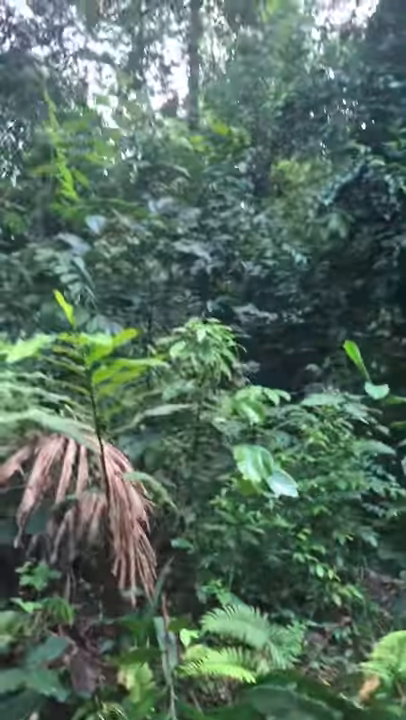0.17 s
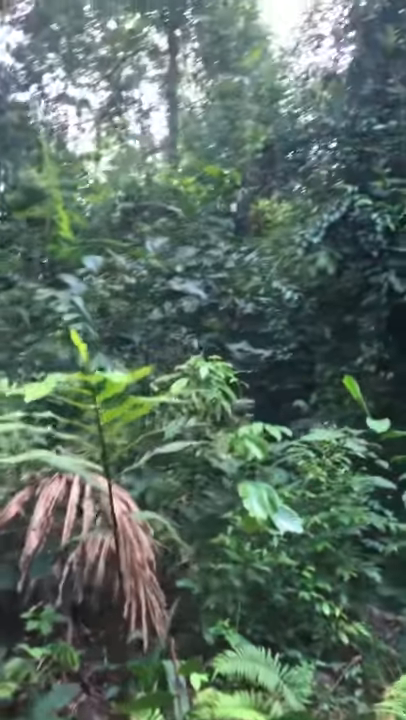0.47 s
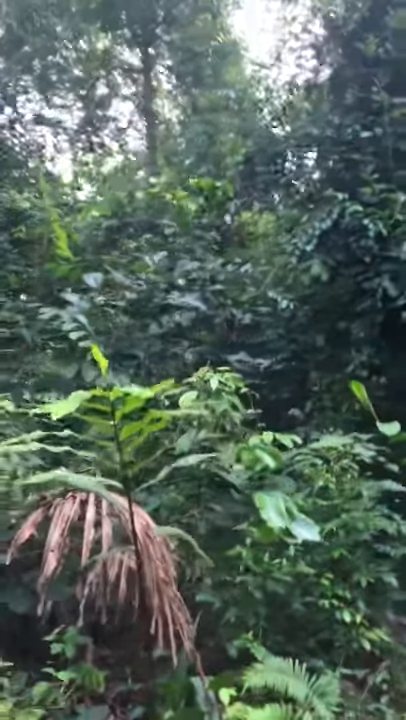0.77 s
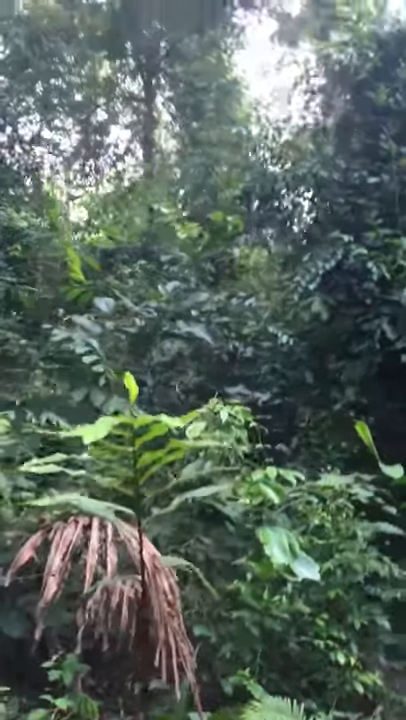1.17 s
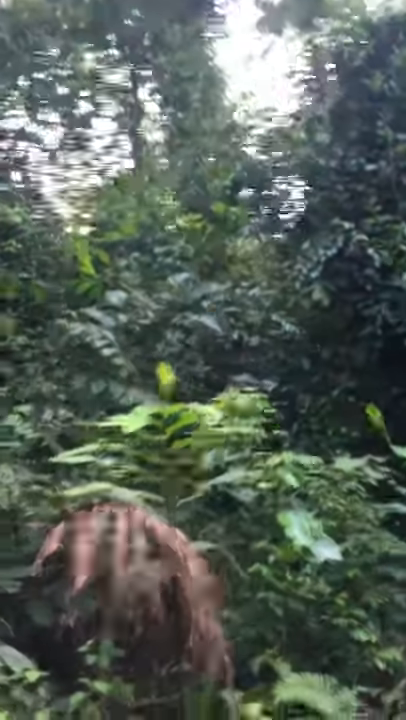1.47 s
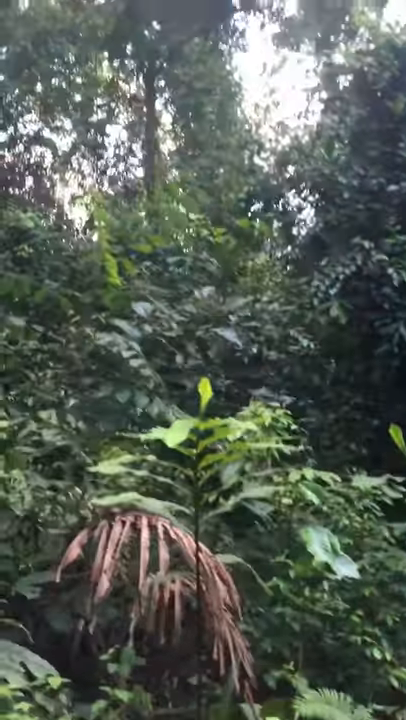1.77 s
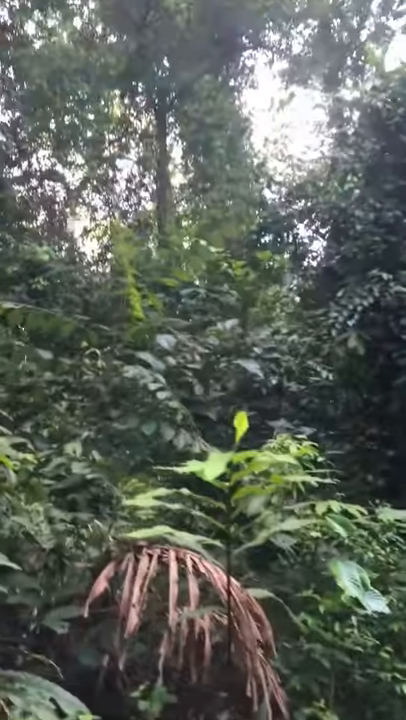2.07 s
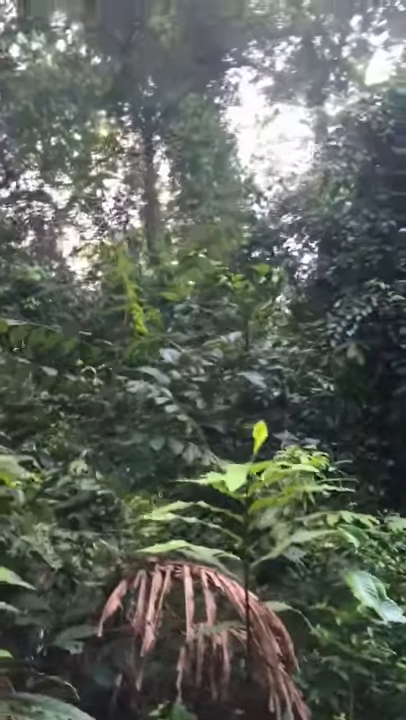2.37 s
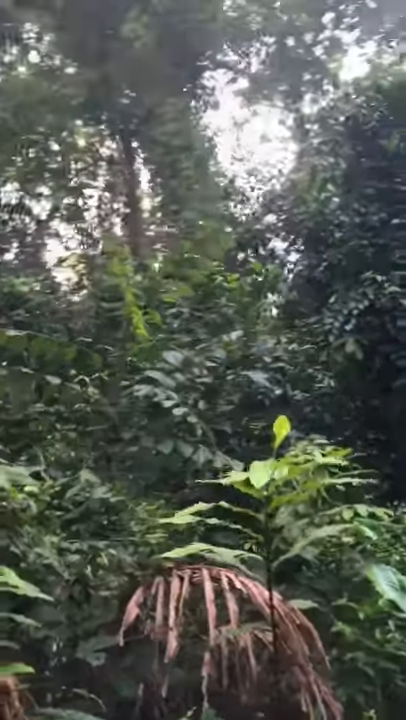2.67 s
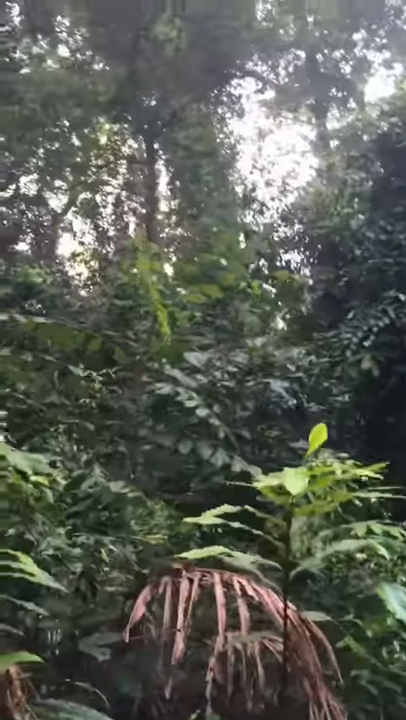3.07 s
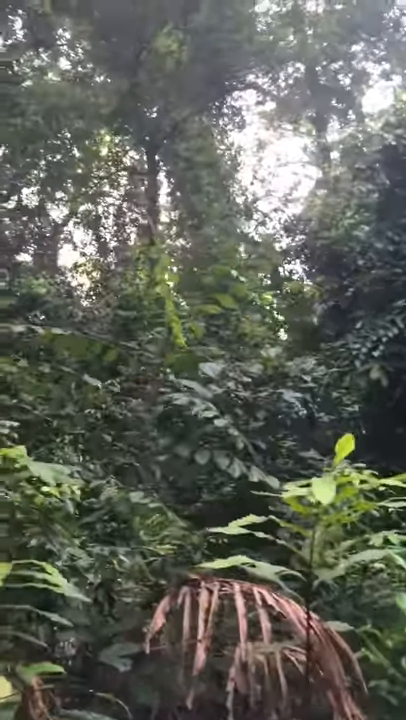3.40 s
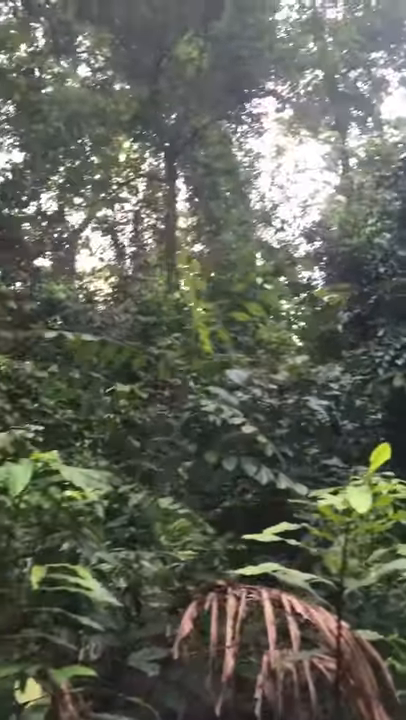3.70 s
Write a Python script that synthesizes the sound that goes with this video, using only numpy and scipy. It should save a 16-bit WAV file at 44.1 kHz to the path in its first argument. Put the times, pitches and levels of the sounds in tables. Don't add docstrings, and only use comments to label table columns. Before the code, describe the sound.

A distant gibbon sings accelerating upward whoops among echoing trees, with insects, small birds and mic knocks.

```python
import sys
import numpy as np
from scipy import signal
from scipy.fft import rfft, irfft
from scipy.io import wavfile
from scipy.ndimage import uniform_filter1d

SR = 44100
rng = np.random.default_rng(int(sys.argv[2]) if len(sys.argv) > 2 else 0)


def convert_level_to_amplitude(level_db):
    exponent = np.asarray(level_db, float) / 20
    return 10 ** exponent


def dump(signal):
    limited = np.clip(np.atleast_2d(signal).T, -1, 1)
    pcm = np.round(limited * 32767).astype(np.int16)
    wavfile.write(sys.argv[1], SR, pcm)


N = 169344


def evened(x):
    return x / np.sqrt(np.mean(x ** 2) + 1e-20)


def read(points, hz):
    point_hz, value = np.transpose(points)
    return np.interp(np.log(hz + 1), np.log(point_hz + 1), value)


def add(mix, start_s, sound):
    part = mix[max(round(start_s * SR), 0):][:len(sound)]
    part += sound[:len(part)]


def resonate(x, hz, width_hz):
    turn = np.exp(2j * np.pi * hz * np.arange(len(x)) / SR)
    r = np.exp(-np.pi * abs(width_hz) / SR)
    return 2 * (turn * signal.lfilter([1 - r], [1, -r], x / turn)).real


def coloured(x, points):
    gain = convert_level_to_amplitude(read(points, np.fft.rfftfreq(len(x), 1 / SR)))
    return irfft(rfft(x) * gain, len(x))


def wander(rate_hz, count=N):
    z = rfft(rng.standard_normal(count))
    hz = np.arange(len(z)) * SR / count
    return evened(irfft(z * np.exp(-(hz / rate_hz) ** 2), count))


# pitch_hz, t60_s
FOREST_DECAY = [(600, 1.22), (1200, 1.14), (2400, 1), (4000, 0.78)]


def forest(x, wet_db):
    hz, t, z = signal.stft(rng.standard_normal(2 * SR), SR, nperseg=512)
    fade = convert_level_to_amplitude(-60 * t / read(FOREST_DECAY, hz)[:, None])
    tail = signal.istft(z * fade, SR, nperseg=512)[1]
    tail *= np.minimum(np.arange(len(tail)) / SR / 0.004, 1)
    hz = np.fft.rfftfreq(len(tail), 1 / SR)
    song_band = (hz > 500) & (hz < 4000)
    tail /= np.sqrt(np.mean(abs(rfft(tail)[song_band]) ** 2))
    return x + convert_level_to_amplitude(wet_db) * signal.fftconvolve(x, tail)[:len(x)]


# pitch_hz, level_db
THROAT = [(560, -2.5), (650, -5), (730, 1.5), (800, -2), (950, 2), (1100, -2.5), (1200, -1.5)]
# pitch_hz, level_db
OCTAVE = [(1240, -62), (1310, -29), (1450, -26), (1650, -24.5), (2100, -26.5), (2260, -14), (2370, -9.5),
          (2450, -16)]
LOW_HZ, SCOOP_S = 566.8, 0.02008
CLIMB_HZ_PER_S, EASE_HZ, EASE_S = 160, 40.26, .04
BEND_S, SETTLE, FLICK_S = 0.00931, 0.748, .049
SWELL_DB, SWELL_S, RELEASE_S = -18, .02, .012
FLICK_DB_PER_HZ, FULL_TOP_HZ = .085, 1120
SHADOW_HZ = 1520


def whoop(start_s, flick_s, knee_hz, top_hz, effort_db):
    knee_s = flick_s - start_s
    t = np.arange(0, knee_s + FLICK_S, 1 / SR)
    ease = EASE_HZ * (np.exp(np.minimum(t - knee_s, 0) / EASE_S) - 1)
    climb = knee_hz + CLIMB_HZ_PER_S * (t - knee_s) + ease
    slow = climb - (climb[0] - LOW_HZ) * np.exp(-t / SCOOP_S)
    bend = np.logaddexp(0, (t - knee_s) / BEND_S)
    flick = np.tanh(bend / bend[-1] / SETTLE) / np.tanh(1 / SETTLE)
    hz = slow + (top_hz - slow[-1]) * flick
    phase = 2 * np.pi * np.cumsum(hz) / SR

    edges = np.minimum(t / 0.0076, 1) * np.minimum((t[-1] - t) / RELEASE_S, 1)
    level = edges * convert_level_to_amplitude(effort_db + 3 + SWELL_DB * np.exp(-t / SWELL_S))
    level *= convert_level_to_amplitude(FLICK_DB_PER_HZ * min(top_hz - FULL_TOP_HZ, 0) * np.clip(bend, 0, 1))
    note = level * convert_level_to_amplitude(read(THROAT, hz)) * np.sin(phase)
    octave = level * convert_level_to_amplitude(read(OCTAVE, 2 * hz)) * np.sin(2 * phase)
    hidden = np.clip((2 * hz - SHADOW_HZ) / 150, 0, 1)
    return note + (1 - hidden) * octave, hidden * octave


# start_s, flick_s, pitch_at_flick_hz, top_hz, effort_db
WHOOPS = [(-.1, 0.304, 730.4, 1035, -34.5), (0.569, 0.974, 747.3, 1036, -36),
          (1.21, 1.54, 748.6, 1068, -35), (1.751, 1.978, 756.7, 1119, -36),
          (2.161, 2.335, 768.7, 1157, -36.5), (2.506, 2.64, 749, 1177, -36),
          (2.802, 2.892, 736.4, 1196, -34.5), (3.056, 3.125, 753, 1199, -33.5),
          (3.273, 3.339, 743.7, 1240, -36.5), (3.481, 3.545, 726.6, 1230, -35),
          (3.678, 3.733, 735.3, 1241, -35)]
LEAD = SR
WAVER_DB, SONG_WET_DB, OCTAVE_WET_DB = 2.5, -3.5, 2
SHADOW = .55


def gibbon():
    song, octave = np.zeros((2, N + LEAD))
    for row in WHOOPS:
        open_part, hidden_part = whoop(*row)
        add(song, row[0] + LEAD / SR, open_part)
        add(octave, row[0] + LEAD / SR, hidden_part)
    waver = convert_level_to_amplitude(WAVER_DB * wander(26.2, count=N + LEAD))
    song = forest(song * waver, SONG_WET_DB)
    return (song + forest(octave, OCTAVE_WET_DB) - SHADOW * octave)[LEAD:]


# start_s, length_s, from_hz, to_hz, level_db
BIRDS = [(0, 0.022, 2520, 2430, -66), (0.237, .07, 3400, 3048, -70), (0.656, .3, 4080, 3970, -69.5),
         (0.86, 0.051, 3180, 3075, -67), (1.142, 0.012, 3750, 3640, -60), (1.18, 0.04, 2600, 3960, -53),
         (1.22, 0.043, 2900, 4280, -59), (1.236, .04, 5200, 3430, -55), (1.468, 0.056, 2800, 3840, -53),
         (1.511, 0.031, 3100, 4150, -52), (1.545, 0.046, 5300, 3497, -54), (2.818, 0.019, 3800, 3400, -58),
         (3.151, 0.068, 3900, 3540, -66), (3.506, 0.017, 2900, 3260, -50), (3.55, 0.036, 3140, 3040, -60)]
GLIDE_SHARE = 0.21
RISING_DB = -9
FLUTTER_DB, BIRD_WET_DB = 2.2, -2.5


def birds():
    out = np.zeros(N)
    for start_s, length_s, from_hz, to_hz, level_db in BIRDS:
        u = np.arange(0, 1, 1 / SR / length_s)
        hz = to_hz + (from_hz - to_hz) * np.exp(-u / GLIDE_SHARE)
        flutter_db = FLUTTER_DB * wander(70, count=len(u) + 999)[:len(u)]
        level = convert_level_to_amplitude(level_db + 6 + RISING_DB * (to_hz > from_hz) + flutter_db)
        swell = np.sin(np.pi * u ** 1.3) ** .5
        add(out, start_s, level * swell * np.sin(2 * np.pi * np.cumsum(hz) / SR))
    return forest(out, BIRD_WET_DB) - .4 * out


# pitch_hz, width_hz, level_db, throb_rate_hz, throb_db
CHOIRS = [
    (6960, 277, -62, 33, 1),
    (5900, 375, -69, 19, 0.5),
    (9300, 560, -71, 28, 1),
    (13100, 2500, -77, 90, -0.3),
]
WHINE_HZ, WHINE_WIDTH_HZ, WHINE_DB = 5384, 13, -70


def insects():
    out = np.zeros(N)
    for pitch_hz, width_hz, level_db, throb_rate_hz, throb_db in CHOIRS:
        offset = abs((np.fft.rfftfreq(N, 1 / SR) - pitch_hz) / width_hz)
        bell = np.exp(-offset ** 1.28 / 2)
        band = irfft(rfft(rng.standard_normal(N)) * bell, N)
        throb = convert_level_to_amplitude(level_db + throb_db * wander(throb_rate_hz) + .5 * wander(2.2))
        out += throb * evened(band)
    narrow = resonate(rng.standard_normal(N), WHINE_HZ, WHINE_WIDTH_HZ)
    whine = evened(resonate(narrow, WHINE_HZ, 40))
    return out + convert_level_to_amplitude(WHINE_DB) * convert_level_to_amplitude(2.5 * wander(6)) * whine


# start_s, level_db, low_hz, high_hz, t60_s
TAPS = [(0.457, -34, 1350, 4630, 0.037), (.5826, -41, 1300, 3300, 0.029), (0.643, -41, 900, 3340, 0.054),
        (0.7544, -31.5, 378, 1204, 0.0075), (.952, -36, 1500, 8800, 0.014),
        (1.3603, -47.5, 3010, 3900, 0.041), (2.592, -47, 1200, 3500, 0.064), (2.865, -41, 1190, 3770, 0.04),
        (2.9075, -39, 1200, 2980, 0.03), (2.9465, -36, 8800, 14000, .01), (3.128, -56, 10600, 12600, 0.009),
        (3.236, -60, 9000, 13900, 0.0089)]
# start_s, level_db, low_hz, high_hz, t60_s
BUMPS = [(.002, -51, 101, 860, 0.024), (0.228, -57, 121, 256, 0.31), (0.437, -63.5, 70.5, 158, 0.076),
         (0.529, -53, 250, 875, 0.11), (0.591, -47, 130, 535, 0.25), (0.95, -34, 130, 1020, 0.12),
         (1.672, -57, 148, 213, 0.12), (2.002, -56, 120, 445, 0.075), (2.17, -60, 102, 194, .1),
         (2.388, -60, 280, 410, 0.12), (2.478, -44, 134, 740, 0.081), (2.583, -42, 138, 700, 0.072),
         (2.9399, -26, 159, 1730, 0.1), (3.171, -58.5, 250, 418, 0.16), (3.437, -53.5, 123, 407, 0.05),
         (3.759, -63, 225, 330, 0.034)]


def knocks():
    out, t = np.zeros(N), np.arange(SR // 8) / SR
    for start_s, level_db, low_hz, high_hz, t60_s in TAPS + BUMPS:
        rattle = rng.standard_normal(len(t)) * convert_level_to_amplitude(-60 * t / t60_s) * 0.07
        blow = rattle + (t == 0)
        case = signal.butter(2, [low_hz, high_hz], "band", fs=SR, output="sos")
        knock = signal.sosfilt(case, blow)
        add(out, start_s, convert_level_to_amplitude(level_db + 2) * knock / abs(knock).max())
    return out


# start_s, rise_s, t60_s, level_db
RUSTLES = [
    (0.578, 0.016, 1, -61),
    (2.8, 0.094, 0.94, -52),
    (2.935, 0.022, 1, -47),
]
# pitch_hz, level_db
RUSTLE_COLOUR = [(740, -38), (1250, -13), (1950, -7), (2560, -9), (3650, -8), (5530, -21), (6330, -20),
                 (9300, -23), (15000, -39)]
# pitch_hz, width_hz, level_db
TWIG = [(1940, 40, -8), (2730, 40, -2), (3200, 70, -7), (3560, 70, -5)]


def rustles():
    size = convert_level_to_amplitude(1.33 * np.minimum(rng.exponential(1, N), 4))
    falls = rng.random(N) < 2500 / SR
    grains = size * falls * rng.standard_normal(N)
    leaves = evened(coloured(grains, [(150, -44)] + list(RUSTLE_COLOUR)))
    rings = sum(convert_level_to_amplitude(level_db) * resonate(leaves, hz, width_hz) for hz, width_hz, level_db in TWIG)
    leaves = evened(leaves + 3.0 * rings)
    t, shape = np.arange(N) / SR, np.zeros(N)
    for start_s, rise_s, t60_s, level_db in RUSTLES:
        rise = np.clip((t - start_s) / rise_s, 0, 1)
        shape += rise * convert_level_to_amplitude(level_db - 60 * np.maximum(t - start_s, 0) / t60_s)
    return shape * leaves * convert_level_to_amplitude(2.5 * wander(35))


# pitch_hz, level_db
AIR = [(25, -19), (60, -1), (400, -8), (1500, -7.5), (5000, -12.5), (8000, -11), (14200, -32.5),
       (14800, -31)]
AIR_DB = -66


def air():
    level = convert_level_to_amplitude(AIR_DB + .8 * wander(8))
    return level * evened(coloured(rng.standard_normal(N), AIR))


def scene():
    return (gibbon() + birds() + insects() + knocks() + rustles() + air())[None]


def band_limit(x):
    return signal.sosfilt(signal.butter(12, 15690, fs=SR, output="sos"), x)


GATE_DB, GATE_DEPTH_DB = -3.5, -30
EDGE_HZ = 15300


def record(dry):
    hz, _, z = signal.stft(dry[0], SR, nperseg=2048)
    power = uniform_filter1d(abs(z) ** 2, size=3, axis=0)
    around = uniform_filter1d(power, size=91, axis=0)
    weak = power < convert_level_to_amplitude(2 * GATE_DB) * around
    depth_db = GATE_DEPTH_DB * np.clip((hz[:, None] - 4000) / 5000, 0, 1)
    gated = signal.istft(z * convert_level_to_amplitude(depth_db * weak), SR, nperseg=2048)[1][None, :N]
    low_pass = signal.firwin(801, EDGE_HZ, window=("kaiser", 9), fs=SR)[None]
    return band_limit(signal.oaconvolve(gated, low_pass, "same"))


dry = scene()
out = record(dry)
dump(out)
```